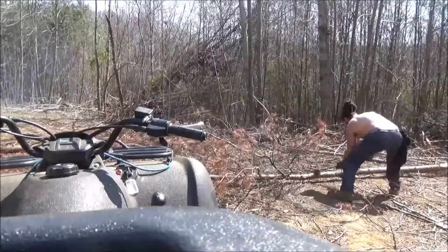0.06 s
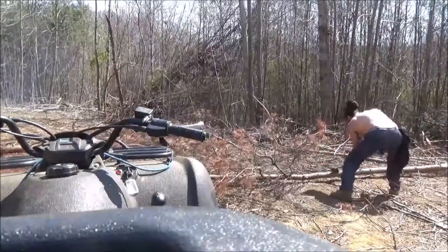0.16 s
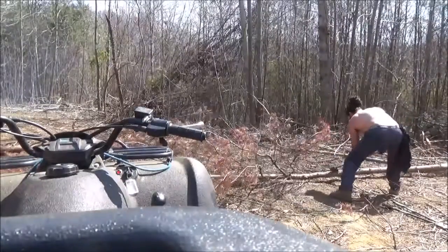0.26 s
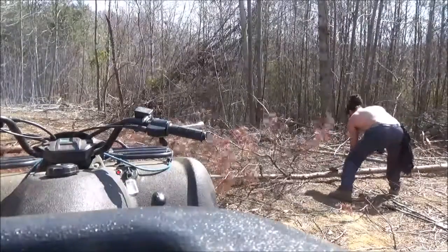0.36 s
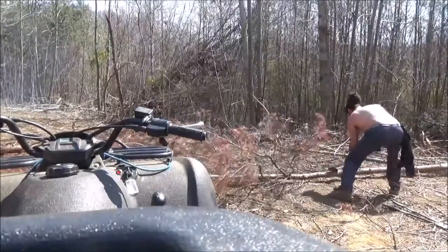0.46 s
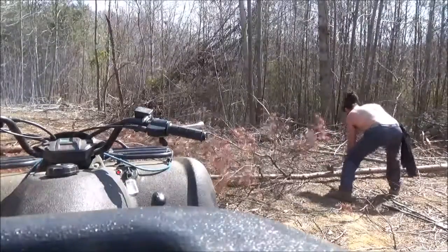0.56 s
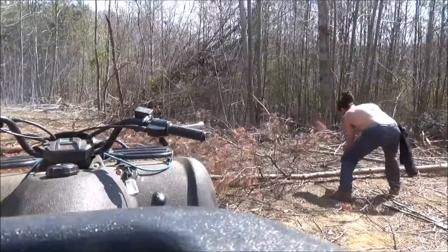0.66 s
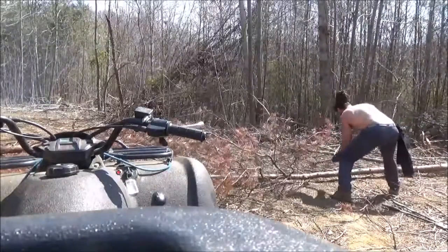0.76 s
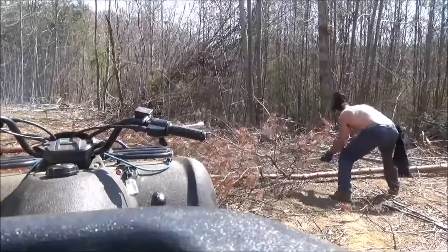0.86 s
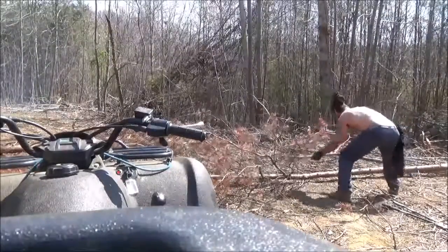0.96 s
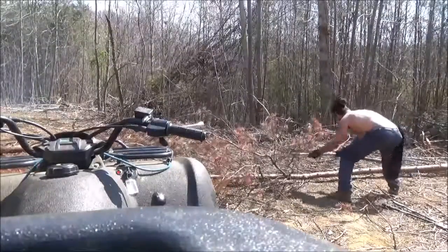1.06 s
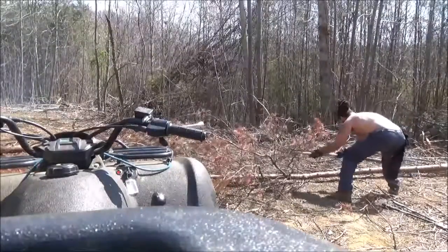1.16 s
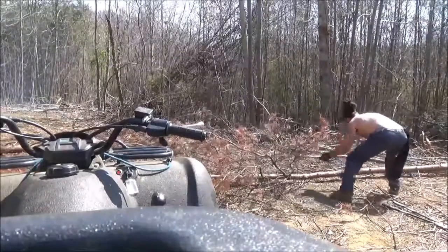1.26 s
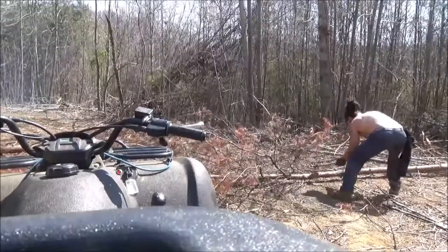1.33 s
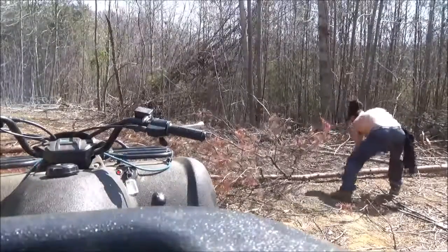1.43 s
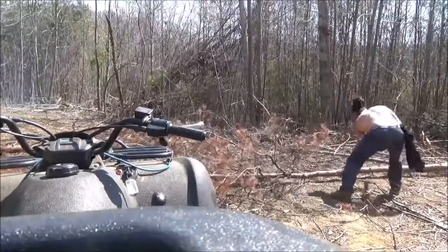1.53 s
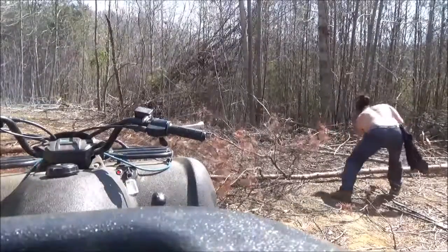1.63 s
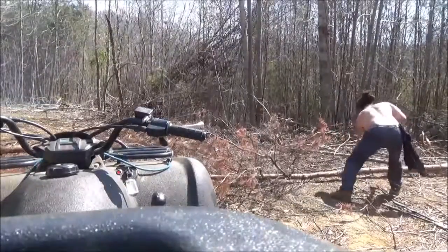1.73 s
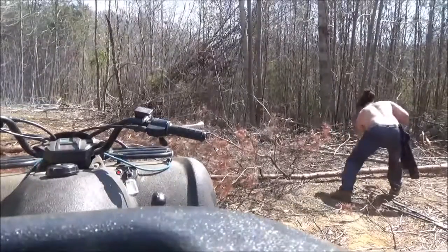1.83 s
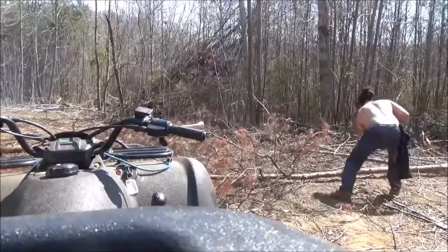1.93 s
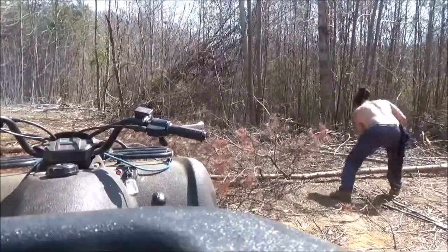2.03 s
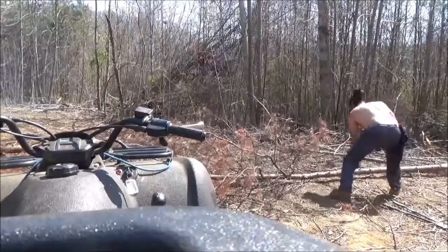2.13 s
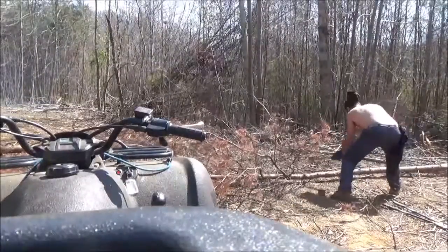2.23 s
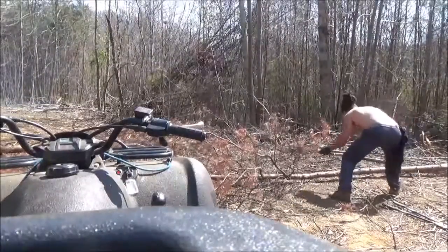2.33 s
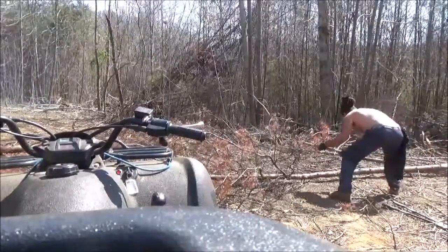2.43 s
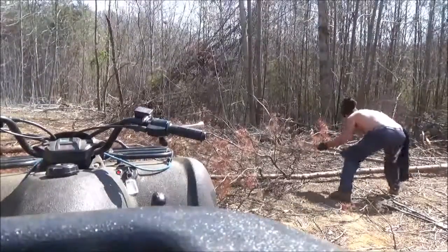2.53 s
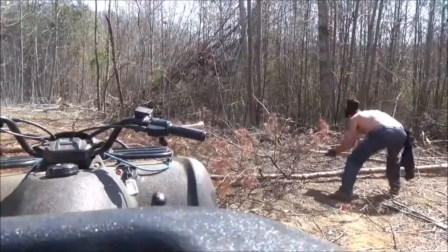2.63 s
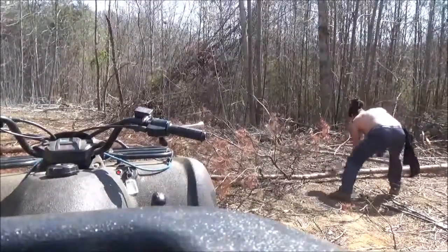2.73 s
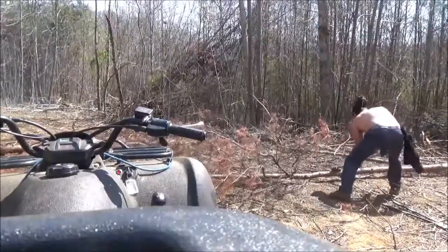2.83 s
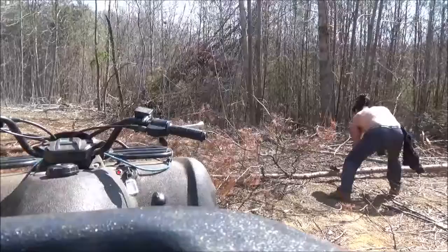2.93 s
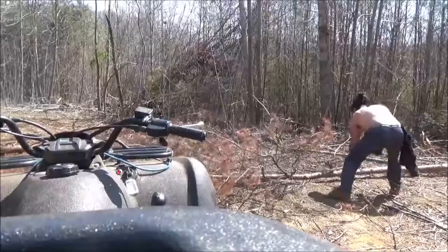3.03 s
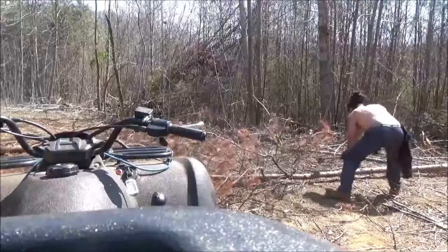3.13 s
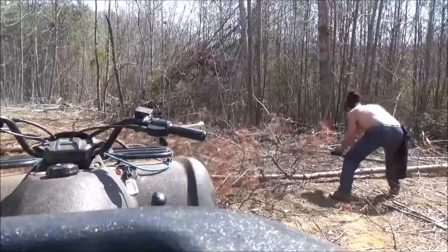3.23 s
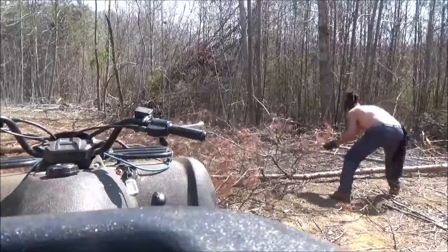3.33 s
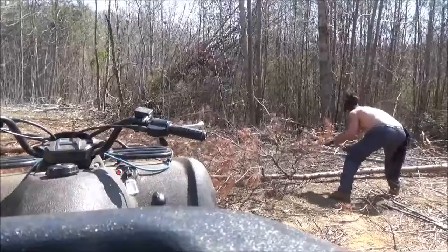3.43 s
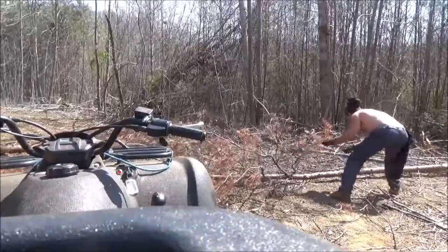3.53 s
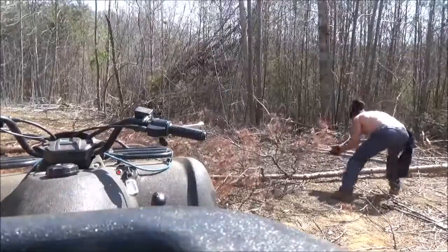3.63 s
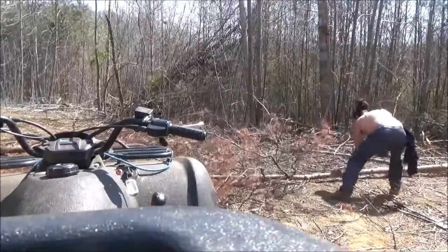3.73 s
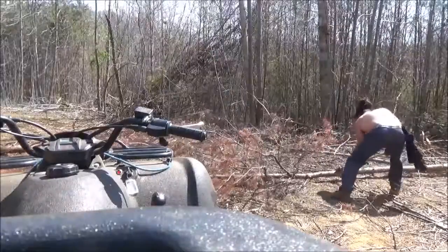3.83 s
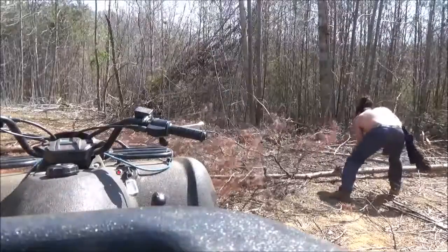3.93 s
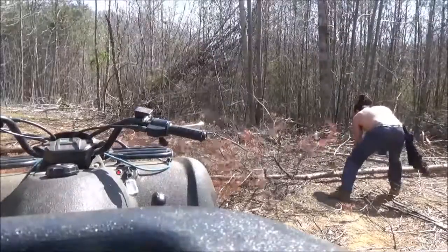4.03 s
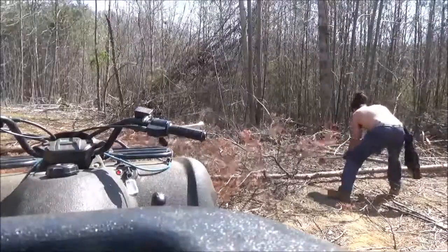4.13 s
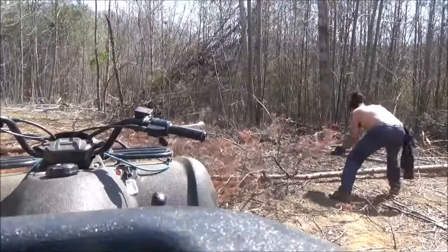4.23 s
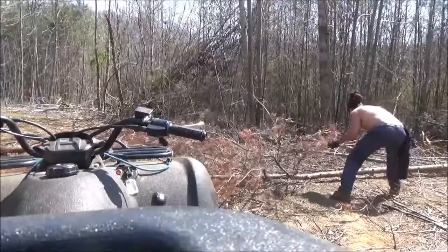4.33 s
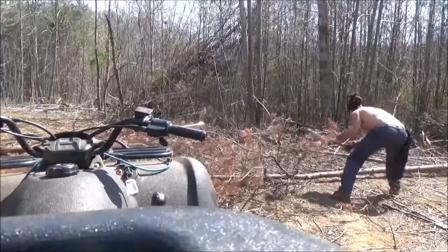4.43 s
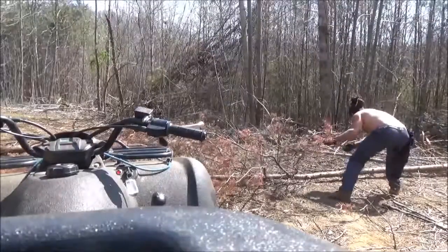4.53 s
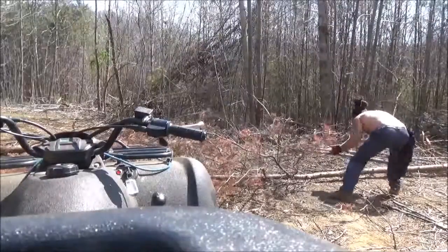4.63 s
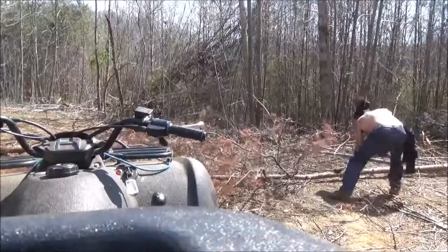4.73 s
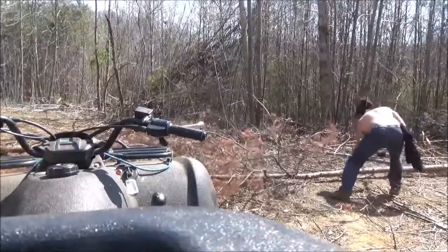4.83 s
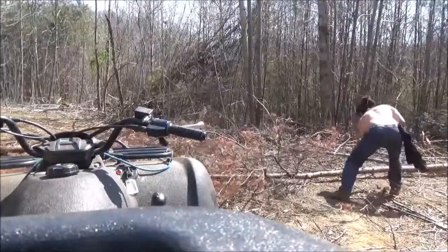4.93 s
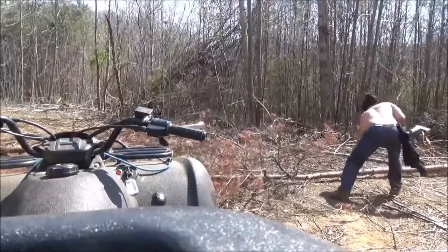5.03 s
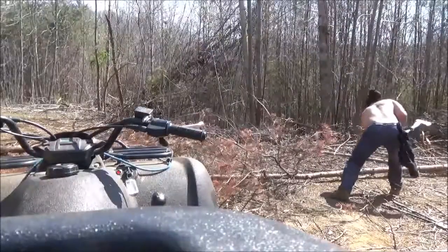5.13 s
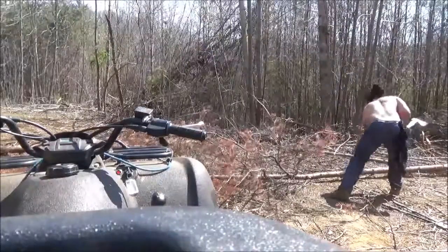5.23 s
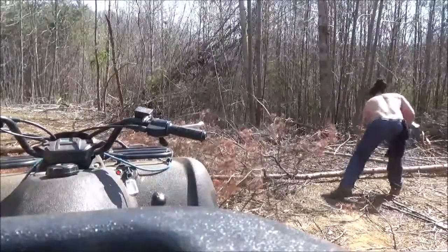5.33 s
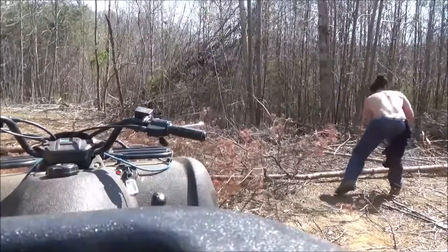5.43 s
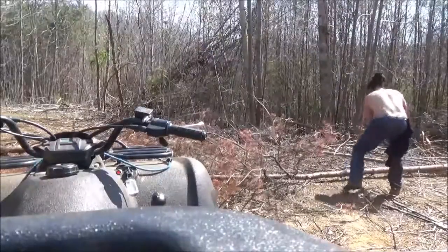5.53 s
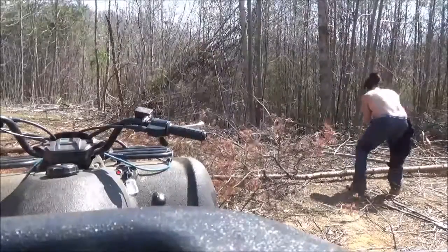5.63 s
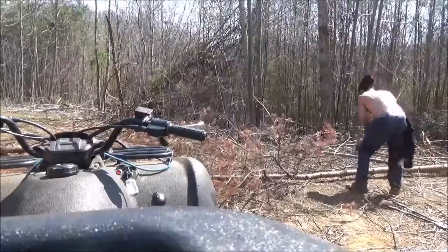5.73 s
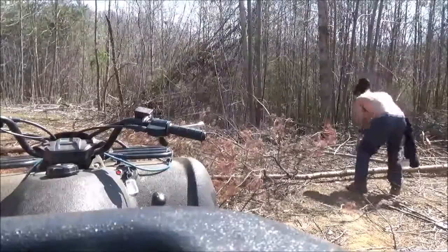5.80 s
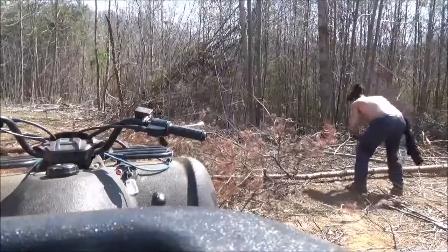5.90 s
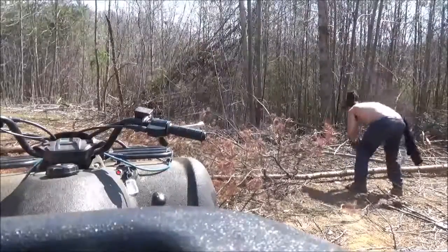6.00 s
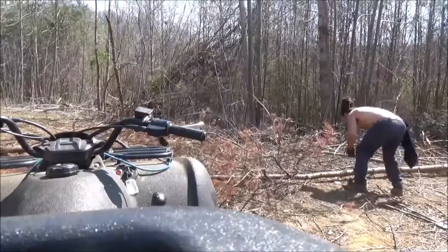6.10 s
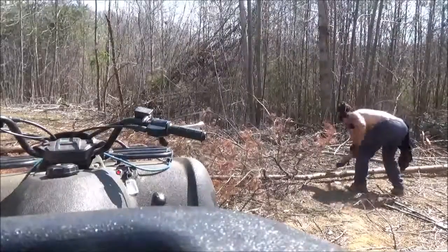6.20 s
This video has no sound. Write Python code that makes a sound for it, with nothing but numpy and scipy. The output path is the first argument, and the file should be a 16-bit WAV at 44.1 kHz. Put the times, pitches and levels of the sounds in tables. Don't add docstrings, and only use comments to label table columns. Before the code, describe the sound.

Sharp, hollow axe blows on wood about every second in open woods, with cracking fibres, rough tree echo and faint wind rumble.

```python
import sys
import numpy as np
from scipy import signal
from scipy.fft import rfft, irfft
from scipy.io import wavfile

SR = 44100
rng = np.random.default_rng(int(sys.argv[2]) if len(sys.argv) > 2 else 0)


def amp(db):
    return 10 ** (np.asarray(db, float) / 20)


def unload_audio(sound):
    columns = np.transpose(np.atleast_2d(sound))
    steps = np.round(np.clip(columns, -1, 1) * 32767)
    wavfile.write(sys.argv[1], SR, steps.astype(np.int16))


N = 276066

# start_s, knock_db, return_db, pitch (share of usual), travel (share of usual time)
KNOCKS = [(0.062, -28.5, -10, 0.84, 0.96), (0.0800, -22.5, 3, 0.85, 1.11), (0.0927, -30.5, 5.5, 0.63, 1.07),
          (0.1397, -13, 3.5, 1.2, 1.06), (.9560, -47, 1, 1.2, 1.01), (1.3880, -6, -2, 0.83, 1.03),
          (1.403, -25, -7, 2.3, 0.93), (1.4095, -23, -13, 2.4, 0.88), (2.7480, -15.5, 1.5, 0.98, 1.04),
          (2.7545, -16, -12, 1.4, 1.2), (2.7580, -13.5, 6, 1.07, 1.06), (3.7480, -8.5, -3.5, 1.19, 0.97),
          (3.759, -5, -5, 0.9, 1.02), (3.7614, -6, -0.5, 1.12, 1.05), (4.76, -13, 4, 0.94, 0.99),
          (4.7752, -19.5, 3, 0.84, 0.92), (5.6330, -32.5, -20, 1.2, 1.01), (5.658, -42.5, 3.5, 1.07, 1.03),
          (6.1789, -6.5, -4.5, 0.91, 1.08), (6.2251, -6, -5, 1.03, 1.05)]
# pitch_hz, level_db
KNOCK_COLOUR = [(40, -70), (120, -17), (260, -11.5), (450, 5.5), (750, 7.5), (1100, 2.5), (1500, -9.5),
                (2200, -34), (5000, -44)]
# travel_ms (at 1 kHz), level_db
RETURNS = [
    (6.6, 3),
    (8.6, -10.5),
    (13.0, -10.5),
    (18.0, -11.5),
]
# pitch_hz, level_db, t60_s
TRUNK_MODES = [(440, -54, 0.028), (565, -51, 0.19), (653, -11.5, 0.025), (741, -26, 0.18),
               (843, -15.5, 0.03), (1130, -82, .1)]

# start_s, peak_db, centre_hz, decay_ms, peak_strength
CRACKS = [(0.0916, -17.5, 5370, 1.5, 3.7), (0.132, -22, 4900, 9, 0.57), (0.136, -21, 10000, 4.6, 1.5),
          (0.1393, -9.5, 4170, 2.8, 2.9), (1.381, -24, 2000, 40, 1.9), (1.3854, -10, 3180, 1.4, 1.2),
          (1.4033, -7, 4500, 5.6, 0.54), (1.41, -13, 4460, 1.1, 0.7), (2.7467, -11.5, 2800, 2.7, 2.9),
          (2.75, -10.5, 3040, 7.3, 0.32), (2.7573, -12.5, 3600, 2.9, 2), (2.757, -12, 4900, 2.2, 2.1),
          (3.746, -12.5, 2660, 4.8, 6.1), (3.748, -13.5, 4900, 6.1, 3.2), (3.7577, -26, 9700, 2.3, 4.2),
          (3.761, -8.5, 4770, 2.8, 0.87), (4.7585, -11.5, 2620, 5.2, 4.9), (4.7694, -10.5, 4000, 2.5, 5.8),
          (4.7741, -8.5, 5100, 0.84, 3.9), (6.1782, -9, 3650, 2.6, 2.06), (6.1828, -11.5, 3600, 1.4, 2.8)]
# start_s, peak_db, centre_hz, decay_ms, peak_strength
SPLINTERS = [(0.038, -37, 5300, 11, 3.4), (0.052, -20.5, 9550, 3.8, 0.74), (0.078, -21, 9500, 2.7, 0.76),
             (0.1072, -22, 10200, 2.5, 4.3), (0.087, -24, 10000, 7, 3), (0.118, -26, 10500, 11, 0.48),
             (0.145, -29, 2900, 18, 3.8), (1.4196, -12.5, 4700, 0.5, 1.3), (1.432, -26, 2730, 6.5, 1.3),
             (2.775, -24, 6000, 3.5, 2), (2.7854, -24, 3610, 5, 2.8), (2.806, -15, 4830, 3.2, 1.5),
             (2.83, -33, 3000, 40, 2.3), (2.910, -37, 4000, 7.4, 0.45), (3.0382, -37, 10000, 2.5, 2),
             (3.79, -24.5, 4990, 3.5, 3), (3.827, -23, 9870, 2.4, 2.4), (3.834, -31, 10000, 2.6, 3),
             (3.896, -43, 10000, 3, 3.2), (4.8005, -17, 4300, 2.5, 2.4), (4.781, -30.5, 9500, 62, 2.6),
             (4.81, -26, 5100, 30, 4), (5.004, -34, 4660, 1.4, 0.37), (6.2045, -24, 4500, 10, 1.1),
             (6.2087, -24, 7500, 4, 1), (6.1825, -11.5, 8400, 1.4, 1.9), (6.23, -36, 9000, 30, 1.8),
             (1.388, -18, 10000, 3.2, 2.4), (1.391, -21, 9500, 3.6, 4), (1.4055, -22, 10000, 4.6, 2.6),
             (3.798, -28, 5000, 7.5, 4), (1.445, -32.5, 2980, 21, 5), (5.555, -45, 4500, 0.92, 2),
             (5.589, -46, 10200, 1, 4)]
# start_s, peak_db, centre_hz, decay_ms
SNAPS = [(0.5653, -28, 5900, 0.71), (0.564, -27.5, 9600, 1), (0.9458, -31.5, 2640, 4.3),
         (0.949, -38, 2300, 2.5), (0.996, -24, 5700, 2.7), (0.997, -32, 8400, 3), (1.0068, -35, 6470, 4.7),
         (1.013, -45, 5000, 1.9), (1.091, -45.5, 5960, 19), (1.2128, -36, 3450, 5.8),
         (1.229, -38.5, 5850, 13), (1.2446, -32, 4770, 1.6), (4.1066, -51, 2530, 2.8),
         (5.164, -31.5, 10000, 1.1), (5.227, -46, 3010, 3.6), (5.281, -37, 3080, 1.8),
         (5.2926, -25.5, 1830, 2.5), (5.325, -38.5, 2900, 3.1), (5.371, -27, 6200, 0.4),
         (5.471, -46.5, 9400, 28), (5.482, -42, 2500, 2), (5.505, -40.5, 3000, 2.8),
         (5.511, -46, 10000, 28), (5.632, -39, 1650, 3.1), (5.644, -41.5, 4000, 37),
         (5.655, -41, 2820, 2.5), (5.671, -27.5, 7150, 2.8), (5.68, -32, 2500, 2.4),
         (5.759, -45, 8400, 5.4), (5.866, -34, 2000, 1.6), (5.9457, -55, 2700, 2), (5.968, -58, 2500, 2.7),
         (6.1227, -32, 2100, 1.3), (6.122, -35.5, 9200, 1.6), (5.302, -44, 3000, 3.7),
         (5.438, -46, 5000, 2), (5.6, -49, 10200, 2), (5.64, -45, 9500, 2), (5.66, -40, 10000, 35)]
# pitch_hz, level_db
CRACK_COLOUR = [(700, 4), (1500, 7.5), (1850, -6.5), (2150, -24), (2300, 0), (3800, -3), (5200, 0),
                (5800, -10), (7000, -9.5), (10000, -3), (11200, -4), (12500, -36)]
SPLINTER_COLOUR = [(500, -11), (1500, -4), (2100, -16), (2300, -1.5), (5200, 0), (5800, -0.5), (7000, -10),
                   (10000, -2), (11200, -4.5), (12500, -7)]
SNAP_COLOUR = [(500, 5.5), (1200, 2.5), (2300, 0.5), (5200, -1), (7000, -11.5), (10000, -3.5), (11200, -5),
               (12500, -34)]
# lean_db, spread_db
CRACK_LEANS = [
    (-3.5, 2.5),
    (0, 5.5),
    (-2.5, 3.5),
]
SNAP_PEAK = 4.6

# start_s, low_db, middle_db, high_db (mode families), t60_s
RINGS = [(0.001, -52, -77, -46, 0.38), (0.051, -47, -64, -55, 0.41), (0.0804, -51, -55, -17, 0.1),
         (0.092, -14, -48, -10, 0.023), (0.095, -39, -60, -60, 0.42), (1.44, -50, -33, -55, 0.17),
         (0.1402, -0.5, -16, -45, 0.009), (0.144, -60, -34, -60, .12), (.9560, -33, -56, -65, 0.032),
         (1.387, -38, -40, -5.5, 0.037), (1.4037, -27, -36, -40, 0.057), (1.4057, -15.5, -29, -44, 0.04),
         (2.746, -14.5, -20, -27, 0.061), (2.7580, -62, -48, -36, 0.039), (2.797, -58, -25, -55, 0.063),
         (3.7465, -7.5, -20, -15, 0.053), (3.7617, -38, -45, -38, 0.04), (4.7590, -3, -19, -21, 0.034),
         (4.77, -24, -31, -44, 0.37), (0.566, -47, -60, -44, 0.3), (6.178, -54, -48, -42, 0.041),
         (6.228, -59, -33, -36, 0.23)]
# pitch_hz, level_db, family (0 low, 1 middle, 2 high), sharp_share (starts this much sharp)
STEEL_MODES = [(2279, -7.5, 0, 0.43), (2330, -19, 0, 0.34), (3020, -7.5, 1, 0.0092), (5230, -14, 2, 0.008),
               (5400, -33, 2, .01), (6000, -13.5, 1, .005), (9900, -26, 2, .005)]
GRIPS = [0.19, 4.902]
SETTLE_S = 0.0013

# start_s, level_db, pitch_hz, length_cycles
THUDS = [(.088, -20.5, 490, 9.7), (.142, -15, 376, 5.3), (0.144, -14.5, 156, 2.24), (.962, -42, 488, 17),
         (1.130, -41, 55, 1.8), (1.183, -23.5, 64.3, 3.3), (1.296, -30, 252, 4.6), (1.391, -21, 370, 3.8),
         (2.753, -32.5, 190, 9), (3.764, -28, 328, 20), (4.095, -48.5, 337, 29), (4.769, -24.5, 335, 14.4),
         (5.655, -37.5, 430, 9.5), (6.183, -12, 327, 3.3), (1.423, -39, 450, 3.6), (2.801, -23, 510, 4.4),
         (2.811, -21, 596, 4.1), (2.864, -29.5, 730, 8.5), (2.877, -31, 580, 5.7), (3.803, -34, 700, 4),
         (3.814, -29, 804, 5), (3.829, -30, 650, 4.9), (3.864, -27, 750, 4.6), (3.873, -29, 700, 3),
         (4.874, -34.5, 776, 8.1), (6.199, -28, 520, 4), (6.1885, -12, 526, 3.2), (6.2355, -17, 560, 3),
         (2.753, -15, 900, 6), (.094, -22, 600, 6), (2.823, -28, 750, 6.1), (2.842, -29, 617, 3.3),
         (2.852, -31, 700, 4.5), (2.893, -33, 800, 6), (2.912, -36, 603, 5), (3.79, -27, 480, 5),
         (3.846, -35, 700, 5), (3.884, -33.5, 700, 8), (2.771, -20, 600, 5), (0.155, -24, 600, 6.4),
         (2.785, -26, 1000, 8), (2.804, -23, 1200, 7.3), (1.468, -35, 1200, 10), (1.886, -46, 230, 1.4),
         (1.97, -38, 150, 2.2), (2.42, -34, 200, 2.3), (2.475, -36, 130, 2)]

# pitch_hz, near_db, near_t60_s, far_db, far_t60_s
WOODS = [(200, -9, 0.23, -16.5, 0.8), (404, -6, 0.082, -22, 0.65), (736, -9, 0.072, -20, 0.91),
         (1120, -18, 0.3, -18, 0.58), (2000, -13, 0.71, -6.5, 0.42), (4000, -13.5, 0.39, -15, 0.79),
         (10000, -6, 0.38, -17.5, 1)]
# pitch_hz, width_hz, added_share
WOODS_PEAKS = [(2040, 140, -0.4), (700, 330, 0.049), (3050, 120, 0.34), (5100, 500, 0.4),
               (1550, 310, -0.15)]
# pitch_hz, share
GRIT_SHARE = [(800, .1), (2500, .35), (9000, .45)]
GRIT_PER_S, GRIT_S = 700, 0.001
WOODS_LIKENESS, STEEL_SCATTER_DB = 0.65, -5

# peak_s, level_db
RUSTLE = [(0.01, -48), (0.47, -49), (1.7, -48.5), (2.91, -47.5), (4.08, -47.5), (4.929, -47), (5.7, -46.5)]
# pitch_hz, level_db (per Hz)
RUSTLE_COLOUR = [(240, -15), (400, -2.5), (454, 1), (618, 2), (763, -1), (1520, -4), (8680, -18),
                 (10100, -14), (11500, -20), (15000, -60), (22000, -120)]
RUSTLE_RISE_DB_PER_S, RUSTLE_FALL_DB_PER_S, RUSTLE_REST_DB = 57, 17.5, -67

# start_s, end_s, level_db, first_hz, last_hz
TRILLS = [(0.79, 0.936, -68, 2700, 2760), (0.996, 1.207, -63, 2720, 2720), (1.302, 1.385, -67, 2740, 2720),
          (2.303, 2.70, -84, 2700, 2700), (3.201, 3.437, -75, 2800, 2740), (3.45, 3.698, -67, 2740, 2660),
          (4.348, 4.697, -86, 2720, 2730), (5.721, 5.854, -67, 2740, 2720), (5.94, 6.075, -63, 2740, 2720),
          (6.127, 6.17, -66, 2750, 2700)]
TRILL_WIDTH_HZ, TRILL_WANDER_HZ, TRILL_EDGE_S = 45, 25, 0.03

# time_s, rumble_db
WIND = [(0.0, -57), (.12, -65), (.3, -57), (.5, -53.5), (.75, -58.5), (.92, -57.5), (1.15, -49.5),
        (1.3, -47.5), (1.75, -48), (2.0, -49.5), (2.17, -52), (2.38, -49.5), (2.85, -58.5), (3.2, -58),
        (4.5, -62.5), (5.06, -61), (5.5, -59.5), (6.26, -58.5)]
FLUTTER_DB, FLUTTER_FOLLOWS, FLUTTER_LAG_S = -56, 1, 0.18
RUMBLE_LUMPS_DB, FLUTTER_LUMPS_DB = 2, 2

# time_s, firings_per_s, level_db
IDLE = [(0.0, 13.7, -57), (0.35, 12.1, -58.5), (2.42, 14.4, -54), (2.81, 11.6, -61.5), (6.26, 13.8, -64)]

# pitch_hz, level_db (per Hz)
AIR = [(15, -34), (25, -7.5), (102, 5.5), (190, -11), (233, -19), (293, -10.5), (431, -10), (739, -7),
       (840, -9.5), (1770, -19), (2120, -22), (2730, -16), (3190, -24.5), (10400, -32), (11500, -30),
       (15000, -73), (22000, -120)]
# time_s, level_db
AIR_DB = [(0, -54.5), (.7, -50), (1.4, -52), (2.2, -49), (2.7, -52.5), (3.4, -52), (4.3, -49.5),
          (4.7, -52.5), (5.4, -52), (5.9, -55), (6.26, -52.5)]
# pitch_hz, width_hz, level_db
INSECTS = [
    (2740, 260, -74.5),
    (7840, 77, -79.5),
]

# pitch_hz, likeness (0 to 1)
LIKENESS = [(60, 1), (170, 1), (490, 0.84), (1410, 0.54), (4030, 0.59), (11600, 0.75)]
# pitch_hz, lean_db
LEAN = [(60, 2.5), (170, 2.5), (490, -1.0), (1410, -1.5), (4030, -0.5), (11600, -0.5)]
CUTOFF_HZ = 10910


def rms_one(x):
    return x / np.sqrt(np.mean(x ** 2) + 1e-20)


def in_time(rows):
    s, *columns = np.transpose(rows)
    return [np.interp(np.arange(N) / SR, s, c) for c in columns]


def at_hz(points, hz, axis=1):
    table = np.array(points, float)
    return np.interp(np.log(np.maximum(hz, 1)), np.log(table[:, 0]), table[:, axis])


def bins(size):
    return np.arange(size // 2 + 1) * SR / size


def drift(rate):
    r = np.exp(-80 * np.pi * rate / SR)
    slow = signal.lfilter([1], [1, -2 * r, r * r], rng.standard_normal(N // 40 + 2002))[2000:]
    return np.interp(np.arange(N) / 40, np.arange(len(slow)), rms_one(slow))


def ring(clicks, hz, t60):
    r, w = amp(-60 / (t60 * SR)), 2 * np.pi * hz / SR
    return signal.lfilter([0, np.sin(w)], [1, -2 * r * np.cos(w), r * r], clicks + 1e-18)


def resonance(x, hz, width_hz):
    r = np.exp(-np.pi * width_hz / SR)
    top = np.array([1, 0, -1]) * (1 - r * r) / 2
    return signal.lfilter(top, [1, -2 * r * np.cos(2 * np.pi * hz / SR), r * r], x)


def band_pass(x, edges_hz):
    return signal.sosfilt(signal.butter(2, edges_hz, "band", fs=SR, output="sos"), x)


def pair(mid, side, alike):
    alike = np.clip(alike, 0, 1)
    shared, apart = np.sqrt(1 + alike) * mid, np.sqrt(1 - alike) * side
    return np.array([shared + apart, shared - apart]) / np.sqrt(2)


def coloured(mid, side, colour):
    hz = bins(N)
    lean = amp(at_hz(LEAN, hz) / 2 * [[1], [-1]])
    both = pair(rfft(mid), rfft(side), at_hz(LIKENESS, hz))
    return rms_one(irfft(both * amp(at_hz(colour, hz)) * lean, N))


def strikes(db):
    clicks = np.zeros(N)
    clicks[[round(row[0] * SR) for row in KNOCKS]] = amp(db)
    return clicks


def trunk():
    size, lead = 4096, 128
    hz, out = bins(size), np.zeros(N + size)
    for s, knock_db, return_db, pitch, travel in KNOCKS:
        phase = -2j * np.pi * hz * lead / SR + 1j * 1.63
        pulse = amp(at_hz(KNOCK_COLOUR, hz / pitch)) * np.exp(phase)
        pulse /= np.abs(irfft(pulse)).max()
        waves = 0
        for ms, db in RETURNS:
            waves = waves + amp(db) * np.exp(-4j * np.pi * travel * ms / 1000 * np.sqrt(hz * 1000))
        back = waves * amp(return_db - at_hz([(600, -3.0), (1500, 2.0)], hz))
        at = round(s * SR) - lead
        out[at:at + size] += amp(knock_db) * irfft(pulse * (1 + back))
    knock_db, return_db = np.transpose(KNOCKS)[1:3]
    late = np.roll(strikes(knock_db + return_db), round(0.009 * SR))
    modes = sum(ring(late * amp(db + 2 * rng.standard_normal(N)), hz, t60) for hz, db, t60 in TRUNK_MODES)
    modes = signal.sosfilt(signal.butter(2, 330, "high", fs=SR, output="sos"), modes)
    return out[:N] + modes


def tear(hz, ms, peaked, colour):
    t = np.arange(4096) / SR
    mid, side, sizes = rng.standard_normal((3, len(t)))
    clicks = pair(mid, side, 0.95) * amp(3.5 * sizes)
    burst = rms_one(irfft(rfft(clicks) * amp(at_hz(colour, bins(len(t))))))
    peak = resonance(burst, min(hz, 11000), 0.37 * hz)
    burst = burst / (1 + max(peaked, 0)) ** 0.05 + peaked * peak
    decay_s = max(ms, 0.3) / 1000
    swell = 1 - np.exp(-t / (0.28 * decay_s))
    fall = np.exp(-t / decay_s) + 1.44 * np.exp(-t / (0.25 * decay_s))
    burst = burst * swell * fall
    return burst / np.abs(burst).max()


def cracks():
    out = np.zeros((2, N + 4096))
    snaps = [(*row, SNAP_PEAK) for row in SNAPS]
    colours = CRACK_COLOUR, SPLINTER_COLOUR, SNAP_COLOUR
    for rows, (lean_db, spread_db), colour in zip((CRACKS, SPLINTERS, snaps), CRACK_LEANS, colours):
        for s, db, hz, ms, peaked in rows:
            pan_db = lean_db + spread_db * rng.standard_normal()
            at = round(s * SR)
            gains = amp(db + pan_db / 2 * np.array([[1], [-1]]))
            out[:, at:at + 4096] += gains * tear(hz, ms, peaked, colour)
    return out[:, :N]


def steel():
    out, t = np.zeros(N + SR // 2), np.arange(SR // 2) / SR
    sharp = SETTLE_S * (1 - np.exp(-t / SETTLE_S))
    for s, *family_db, t60 in RINGS:
        at = round(s * SR)
        next_grip = min(g for g in [*GRIPS, np.inf] if g > s)
        free = np.exp(-np.maximum(t + s - next_grip, 0) / 0.004)
        for (hz, db, family, share), chance in zip(STEEL_MODES, rng.standard_normal(len(STEEL_MODES))):
            fall = amp(family_db[round(family)] + db + chance - 60 * t / max(t60, 0.01))
            swell = fall * (1 - np.exp(-t / 0.0013))
            out[at:at + len(t)] += free * swell * np.sin(2 * np.pi * hz * (t + at / SR + share * sharp))
    return out[:N] * amp(1.2 * drift(77))


def thuds():
    out, t = np.zeros(N + SR // 4), np.arange(SR // 4) / SR
    for s, db, hz, cycles in THUDS:
        turns, at = hz * t, round(s * SR)
        swell = amp(db + 5 - 30 * turns / cycles) * (1 - np.exp(-turns / 0.79))
        out[at:at + len(t)] += swell * np.sin(2 * np.pi * turns)
    return out[:N]


def woods(x):
    edges, echo = 100 * 2 ** np.arange(0, 7.1, 0.5), 0
    white = rng.standard_normal((2, 2, N))
    lumps_db = 0.72 * drift(49) + 0.74 * drift(300)
    late = np.roll(x, round(0.0016 * SR))
    born = (rng.random(N) < GRIT_PER_S / SR) * rng.exponential(1, N)
    grit = signal.lfilter([1], [1, -np.exp(-1 / (GRIT_S * SR))], born + 1e-12)
    for k, (low, high) in enumerate(zip(edges, edges[1:])):
        near_db, near_s, far_db, far_s = [at_hz(WOODS, np.sqrt(low * high), axis=a) for a in range(1, 5)]
        *band, source = band_pass(np.vstack([white[k % 2], late + 1e-9]), [low, high])
        power = 0
        for db, t60 in ((near_db, near_s), (far_db, far_s)):
            r = amp(-120 / (t60 * SR))
            power = power + amp(2 * db) * signal.lfilter([1 - r], [1, -r], source ** 2)
        lumps = amp(np.roll(lumps_db, k // 2 * SR // 3))
        ticks = 1 + at_hz(GRIT_SHARE, low) * np.roll(grit, k // 4 * SR // 5)
        echo = echo + rms_one(np.array(band)) * np.sqrt(power) * lumps * ticks
    for hz, width_hz, share in WOODS_PEAKS:
        echo = echo + share * resonance(echo, hz, width_hz)
    return pair(*echo, WOODS_LIKENESS) * amp([[-0.6], [0.6]])


def rustle():
    peak_s, peak_db = np.array(RUSTLE)[:, :1], np.array(RUSTLE)[:, 1:]
    since = np.arange(N) / SR - peak_s
    slopes_db = np.minimum(RUSTLE_RISE_DB_PER_S * since, -RUSTLE_FALL_DB_PER_S * since)
    level_db = np.maximum((peak_db + slopes_db).max(axis=0), RUSTLE_REST_DB)
    born = rng.random(N) < 1500 * amp(6.0 * drift(15)) / SR
    sizes = amp(3.1 * np.minimum(rng.exponential(1, N), 5.5))
    grains = rms_one(born * sizes * rng.choice([-1, 1], N))
    mid, side = rng.standard_normal((2, N))
    return amp(level_db - 5.5 + 2.2 * drift(66)) * coloured(mid + 0.64 * grains, side, RUSTLE_COLOUR)


def trills():
    t = np.arange(N) / SR
    phrases, slide = 0, []
    for start, end, db, first_hz, last_hz in TRILLS:
        phrases = phrases + amp(db) * np.clip(np.minimum(t - start, end - t) / TRILL_EDGE_S, 0, 1)
        slide += [(start, first_hz), (end, last_hz)]
    hz, = in_time(slide)
    turns = 2 * np.pi * np.cumsum(hz + TRILL_WANDER_HZ * drift(6)) / SR
    a, b, c, d = [drift(TRILL_WIDTH_HZ) for _ in range(4)]
    mid = (a + 0.54) * np.cos(turns) + b * np.sin(turns)
    side = c * np.cos(turns) + d * np.sin(turns)
    return phrases * pair(*rms_one(np.array([mid, side])), 0.51)


def wind():
    rumble_db, = in_time(WIND)
    t = np.arange(N) / SR
    swing_db = np.interp(t - FLUTTER_LAG_S, t, rumble_db) - rumble_db.mean()
    flutter_db = FLUTTER_DB + FLUTTER_FOLLOWS * swing_db
    levels_db = rumble_db + RUMBLE_LUMPS_DB * drift(7.5), flutter_db + FLUTTER_LUMPS_DB * drift(11.4)
    out = 0
    for level_db, edges_hz, alike in zip(levels_db, ([38, 136], [110, 262.0]), (0.88, 0.78)):
        band = band_pass(rng.standard_normal((2, N)), edges_hz)
        out = out + amp(level_db) * pair(*rms_one(band), alike)
    return out


def engine():
    per_s, level_db = in_time(IDLE)
    beats = np.diff(np.floor(np.cumsum(per_s) / SR + 0.48), prepend=0)
    firings = beats * amp(rng.normal(0, 2.2, N))
    pipe = resonance(resonance(firings + 1e-18, 101.0, 32), 113, 71.5)
    return amp(level_db) * rms_one(pipe)


def air():
    level_db = in_time(AIR_DB)[0] + 0.77 * drift(3)
    far = amp(level_db) * coloured(*rng.standard_normal((2, N)), AIR)
    for hz, width_hz, db in INSECTS:
        song = resonance(resonance(rng.standard_normal((2, N)), hz, width_hz), hz, width_hz)
        far += amp(db + 1.0 * drift(0.49)) * pair(*rms_one(song), 0.16)
    return far


def scene():
    wood = trunk() + thuds()
    spread = 0.1 * np.roll(wood, round(0.00042 * SR))
    head = steel()
    chop = np.array([wood * amp(-1.5) + spread, wood * amp(-0.5) - spread]) + cracks()
    scatter = woods(chop.mean(axis=0) + amp(STEEL_SCATTER_DB) * head)
    near = chop + head * amp([[-1.9], [1.9]]) + scatter + rustle() + trills()
    return near + wind() + engine() + air()


def band_limit(x):
    return signal.sosfilt(signal.butter(12, 12150, fs=SR, output="sos"), x)


def record(dry):
    rounded = np.tanh(dry)
    cut = signal.sosfilt(signal.cheby1(14, 0.5, CUTOFF_HZ, fs=SR, output="sos"), rounded)
    return band_limit(cut)


dry = scene()
out = record(dry)
unload_audio(out)
```